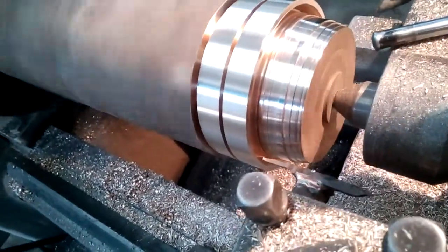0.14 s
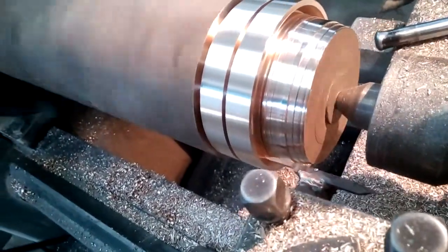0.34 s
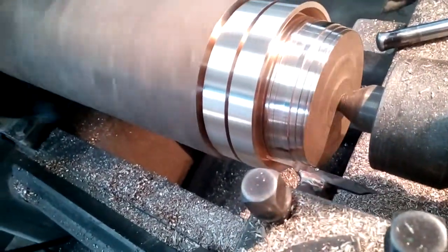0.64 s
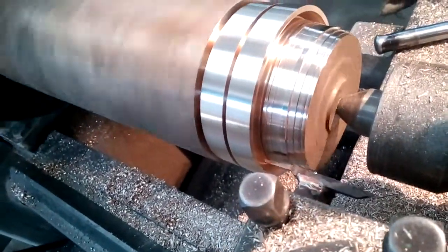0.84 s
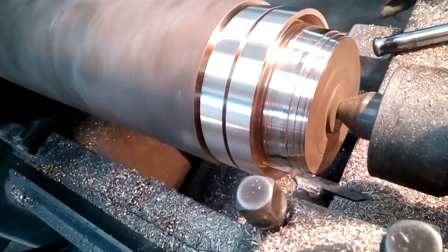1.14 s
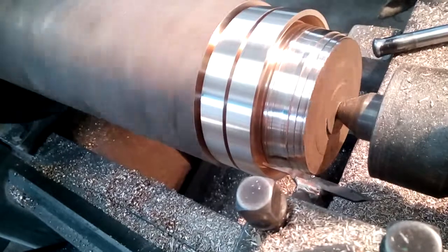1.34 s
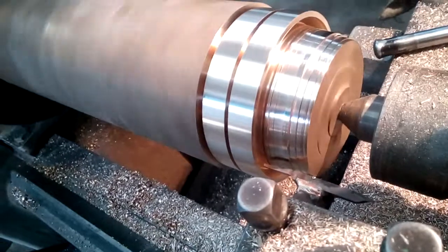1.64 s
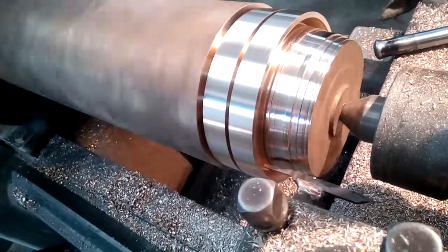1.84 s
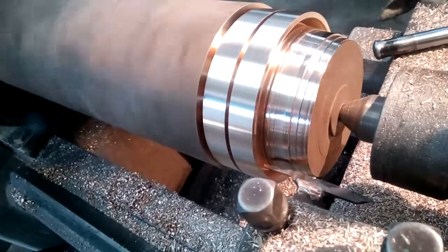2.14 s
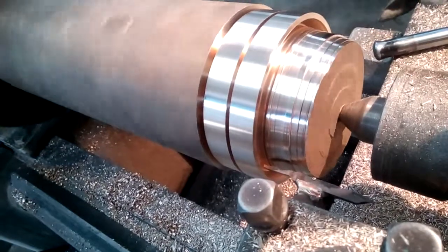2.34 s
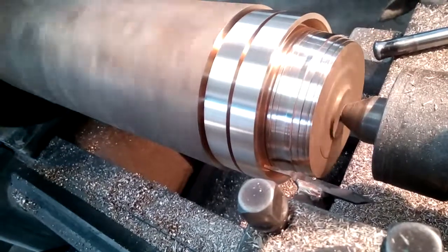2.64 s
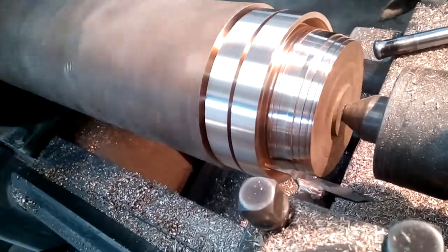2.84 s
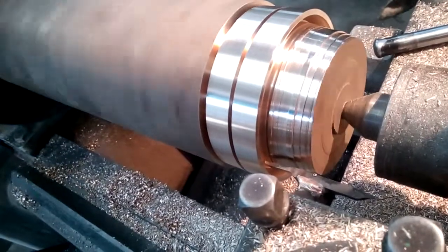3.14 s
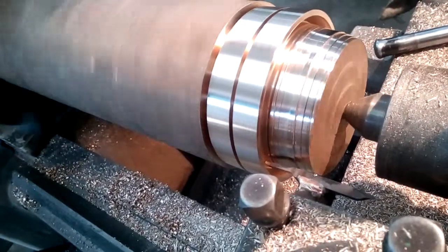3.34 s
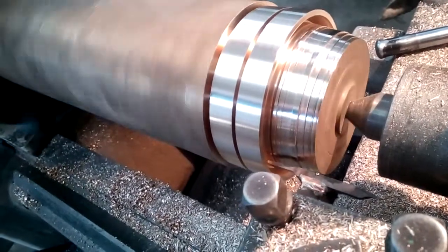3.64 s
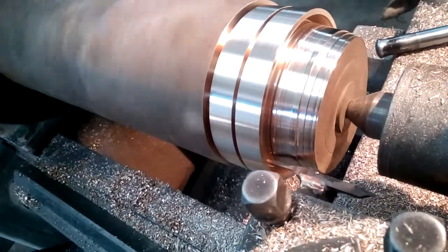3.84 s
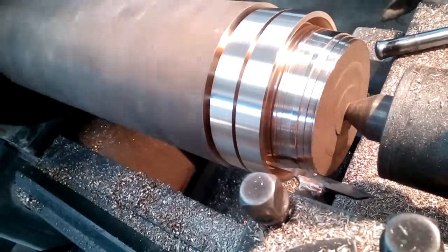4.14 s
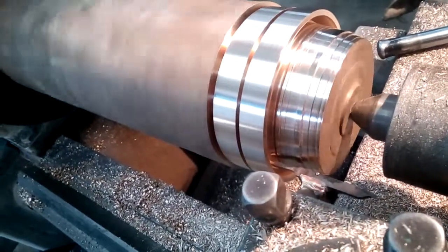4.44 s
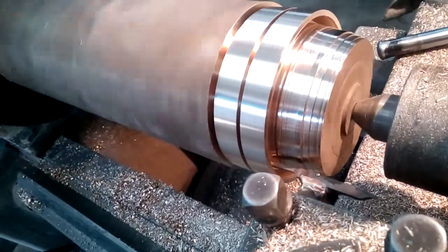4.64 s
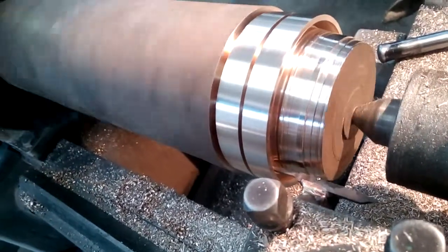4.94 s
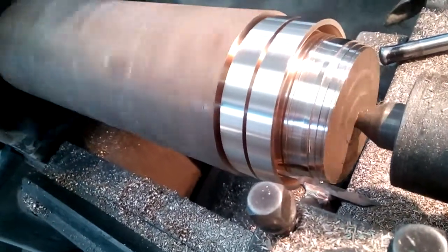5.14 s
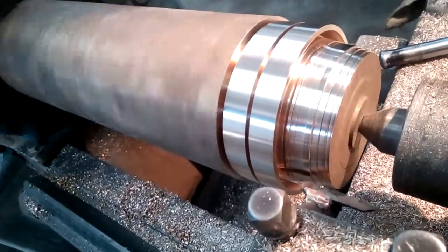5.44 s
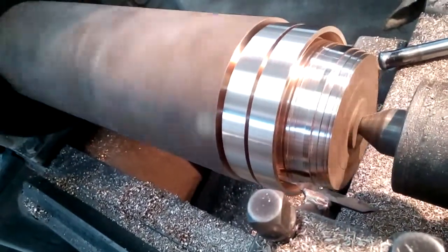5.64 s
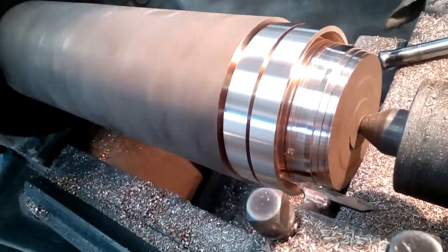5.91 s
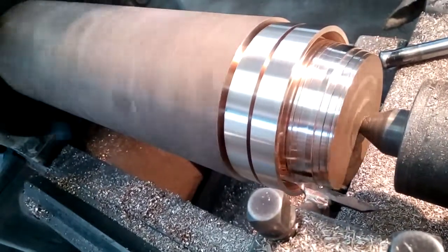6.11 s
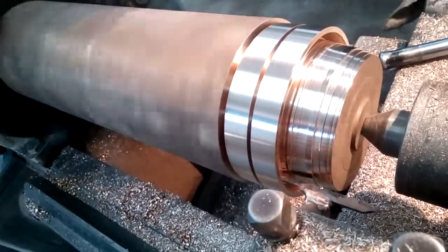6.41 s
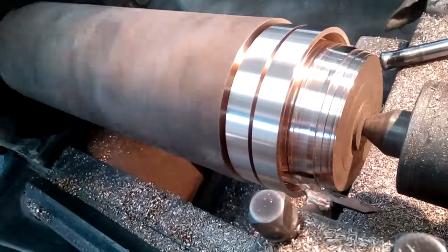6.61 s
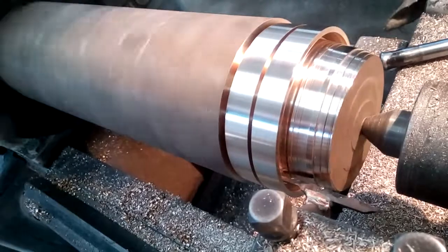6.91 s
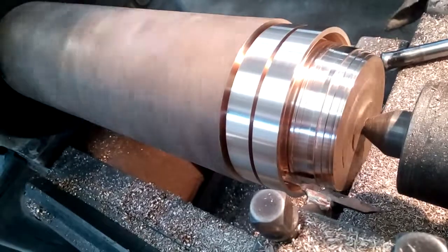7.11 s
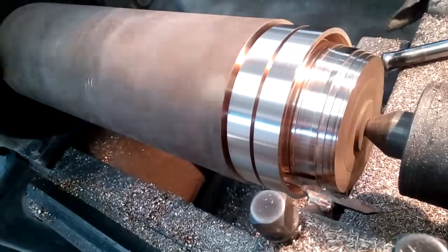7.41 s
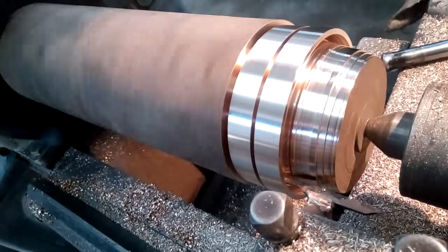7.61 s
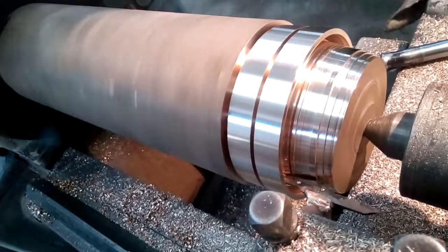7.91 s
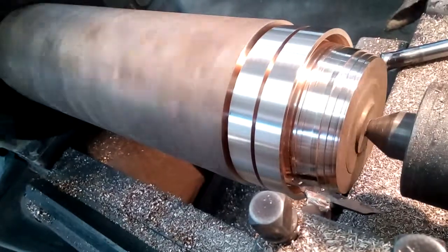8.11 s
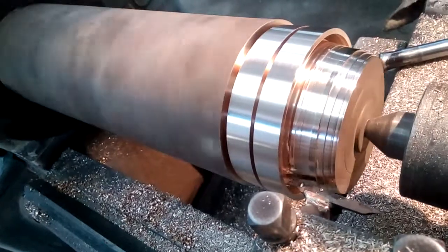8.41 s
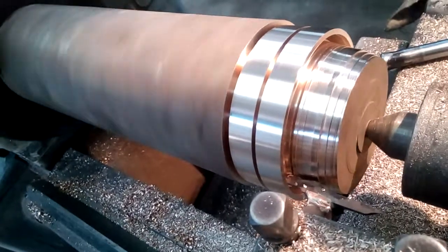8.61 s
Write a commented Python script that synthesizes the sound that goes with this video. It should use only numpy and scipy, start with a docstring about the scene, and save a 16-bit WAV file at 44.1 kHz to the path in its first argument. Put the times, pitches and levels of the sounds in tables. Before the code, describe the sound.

From 0 to about 5.5 s a metal lathe runs alone, close by: steady low gear rumble, grainy midrange hiss from the teeth, wavering gear tones and a low headstock drone that beats slightly. At 5.55 s a tool touches the spinning brass ring with a thin, high scrape. By 5.9 s it swells into a very loud, rough squeal, tearing and chattering, with piercing shrieks, a lower unsteady howl from the ring and brief chip whistles, mostly sliding down. It peaks from 6.1 to 6.8 s, overloading the microphone and covering the lathe, then weakens into scraping until 7.2 s. The lathe is alone until 7.5 s. A second cut begins as faint rasping, grows around 8 s and shrieks strongest near 8.4 s, still rough and whistling until about 8.8 s, at the end. Short workshop reflections surround the cuts.

```python
"""A tool fed twice into a spinning brass ring rasps, then chatters in a loud, rough, high squeal.
Friction drives unsteady tool modes; the ring howls below and growing chips whistle, mostly downwards.
Behind it a lathe runs on: shaped noise for gear rumble and hiss, wavering tones for gears, drive
and headstock. The workshop adds short reflections, and the squeal overloads the microphone."""
import sys
import numpy as np
from scipy import signal
from scipy.fft import rfft, irfft, next_fast_len
from scipy.io import wavfile
from scipy.ndimage import uniform_filter1d

SR = 44100
rng = np.random.default_rng(int(sys.argv[2]) if len(sys.argv) > 2 else 0)


def generate_wav(sig):
    """Save sig (samples, or channels by samples) to the path in sys.argv[1] as 16-bit PCM at SR."""
    pcm = np.round(np.clip(np.atleast_2d(sig).T, -1, 1) * 32767).astype(np.int16)
    wavfile.write(sys.argv[1], SR, pcm)


N = 386316

# low rumble of the running gear train: f/Hz, relative level/dB per Hz
GEAR_RUMBLE_SPECTRUM = [(25, -23), (42, -26), (64, -26), (80, -16.5), (110, -13), (165, -13.5),
                        (195, -10.5), (240, -10), (320, -6.5), (400, -11), (470, -6), (610, -7.5),
                        (710, -12), (1000, -13.5), (1300, -29.5)]
# hiss of the gear teeth: f/Hz, relative level/dB per Hz
GEAR_HISS_SPECTRUM = [(700, -30), (1000, -3.5), (1750, 0.5), (2250, -10), (3400, -9.5), (4500, -14),
                      (4950, -22), (5600, -23), (6000, -19.5), (6550, -20.5), (7000, -32.5), (7700, -37.5),
                      (8400, -53), (10000, -61)]
# tones of motor and gears: f/Hz, relative level/dB, relative spread/Hz
GEAR_TONES = [(98.6, -52.5, 2.4), (130, -55, 4.4), (305, -53, 6.6), (454, -43, 19.97), (483, -46.5, 3.05),
              (560.6, -41, 14), (592, -46, 5.2), (615.6, -43.5, 6), (794.6, -46, 12.22), (858, -44.5, 10.4),
              (961, -41.5, 0.88), (1179, -45, 12.08), (1279, -43, 45), (1475, -43, 10.73),
              (1570, -40.5, 13.4), (1620, -63, 4), (1780, -61, 3.5), (2046, -53, 4.1), (2186, -50, 3),
              (3214, -51, 10.4)]
# hum of the drive: f/Hz, width/Hz, idling level/dB, loaded level/dB
DRIVE_HUM = [(51, 3, -52.5, -58), (84, 1.4, -68, -48.5)]
# beating tones of the headstock: f/Hz, relative level/dB, width/Hz
HEADSTOCK_TONES = [(189.6, -8.5, 16), (196.3, 0.5, 2.85), (211, -4, 7.1), (220.6, -3, 22)]
# tool in the cut: start t/s, end t/s
CUTS = [(5.555, 7.19), (7.525, 8.8)]
# one curve a cut: t/s, friction at the edge level/dB, force of the chip on ring and holder level/dB
CUT_CURVES = [
    [(5.55, -58.5, -46), (5.6, -40, -51), (5.824, -30, -35), (5.916, -19, -20), (6.106, -20, -12.5),
     (6.518, -16, -18), (6.528, -15, -13.5), (6.79, -19, -17), (6.996, -29.5, -37), (7.14, -34, -25.5),
     (7.2, -52, -45)],
    [(7.52, -58, -51), (7.624, -35.5, -37.5), (7.688, -41.5, -33), (7.91, -33, -29.5),
     (8.022, -22.5, -19.5), (8.304, -23.5, -24), (8.388, -15.5, -16.5), (8.396, -19, -18),
     (8.522, -20, -19), (8.626, -26, -20.5), (8.74, -22, -21)],
]
# whistles of growing chips: start t/s, end t/s, start f/Hz, end f/Hz, level/dB
CHIP_WHISTLES = [(6.06, 6.16, 5310, 5050, -13.5), (6.093, 6.227, 5540, 5400, -19),
                 (6.162, 6.225, 4260, 4160, -9), (6.17, 6.256, 2825, 2960, -19.5),
                 (6.185, 6.324, 3840, 3660, -23), (6.33, 6.477, 5430, 5140, -22),
                 (6.504, 6.62, 3760, 3520, -23), (6.875, 7.03, 5370, 4850, -33),
                 (7.064, 7.164, 3060, 3210, -30), (7.778, 7.97, 5300, 4780, -32),
                 (7.975, 8.125, 4000, 3590, -26), (8.0, 8.13, 5000, 4800, -41),
                 (8.13, 8.243, 5420, 5180, -26), (8.682, 8.802, 5160, 5000, -26)]
# modes in which the ring howls: f/Hz, width/Hz, level/dB once it sings freely
RING_MODES = [(1682, 80, -27), (1966, 75, -28.5), (2675, 25, -35)]
# swells of the ring's howl: start t/s, end t/s, start f/Hz, end f/Hz, level/dB
HOWL_SWELLS = [(5.86, 6.1, 1970, 1980, -26.5), (5.88, 6.29, 1700, 1604, -20), (5.86, 6.1, 2790, 2744, -28),
               (5.97, 6.075, 1625, 1687, -15.5), (6.72, 6.92, 2680, 2660, -32),
               (8.14, 8.44, 2670, 2700, -33), (8.32, 8.55, 2075, 2017, -24.5),
               (6.125, 6.215, 2760, 2640, -18), (6.195, 6.28, 1506, 1484, -17.5),
               (6.405, 6.535, 1653, 1736, -10.5), (6.52, 6.63, 1783, 1800, -13.5),
               (6.61, 6.78, 1708, 1657, -12), (6.77, 6.875, 1830, 1894, -22),
               (6.895, 7.0, 1690, 1706, -25.5), (7.078, 7.172, 1582, 1587, -20),
               (8.0, 8.135, 1990, 1960, -23), (8.26, 8.335, 1870, 1790, -23), (8.43, 8.53, 1990, 2040, -18),
               (8.455, 8.57, 1600, 1700, -29), (8.59, 8.715, 1760, 1613, -24.5)]
# resonances of tool, holder and ring under the rasp: f/Hz, width/Hz, relative level/dB
BODY_MODES = [(2340, 100, -10.5), (2950, 270, -12), (3276, 430, -9), (3490, 160, -11), (3980, 66, -2.5),
              (4120, 78, -2), (4620, 45, -3.5), (4610, 100, -11.5), (5600, 130, -7), (5500, 120, -1),
              (5790, 170, 0.5), (6240, 120, 7), (6510, 71, 8), (6750, 170, 3), (7040, 130, -2.5),
              (7460, 64, 0), (7630, 54, -14), (8315, 60, -3.5), (9120, 110, -17), (10140, 120, -19.5),
              (10430, 120, -19.5), (10900, 60, -19.5), (11740, 180, -19.5)]
# broad hiss of tearing metal: f/Hz, relative level/dB per Hz
TEARING_SPECTRUM = [(900, -32), (1500, -4), (3000, -13), (4200, -4.5), (6500, -9.5), (8200, -2.5),
                    (8700, -18.5), (9700, -29), (11500, -25), (12700, -28), (15500, -42)]
# modes in which tool and holder chatter all through a cut: f/Hz, width/Hz, level/dB over the friction
TOOL_MODES = [(4514, 62, -10), (4220, 110, -11), (6050, 54, -0.5), (6380, 47, -3), (7670, 220, -6)]
# shrieks, when the tool locks into one mode: start t/s, end t/s, start f/Hz, end f/Hz, level/dB
SHRIEKS = [(5.575, 5.92, 6430, 6450, -35), (5.67, 5.9, 4500, 4550, -44), (5.725, 5.8, 6440, 6370, -22.5),
           (5.905, 6.18, 6410, 6250, -10), (5.89, 6.18, 4500, 4400, -19.5), (5.96, 6.17, 5980, 6140, -15),
           (6.19, 6.255, 6380, 6420, -6.5), (6.51, 6.595, 6480, 6440, -8.5),
           (6.525, 6.6, 4530, 4500, -21.5), (6.6, 6.77, 6420, 6390, -12.5), (6.755, 6.855, 4240, 4300, -19),
           (7.0, 7.07, 5980, 6100, -21), (7.665, 7.94, 6250, 6200, -30), (7.66, 7.88, 4580, 4540, -36),
           (7.96, 8.2, 6060, 6120, -23.5), (8.325, 8.48, 6470, 6370, -14), (8.345, 8.41, 4500, 4500, -16.5),
           (8.57, 8.69, 6140, 6100, -18)]

LOADED_AT_S, LOADING_S = 6.35, 0.53   # the first heavy cut shifts the hum: when, and over how long
DRONE_DB, DRONE_SAG_DB, SAG_POWER = -35, 11, 5.7   # idle level; it sags, but only near full load
SHOP_T60_S = 0.28
LOAD_FOLLOWS = 0.402   # share of the friction's swing in dB that the load follows
SPINDLE_HZ, RUNOUT_DB, HIGH_SPOT_S = 11.5, 0.48, 5.95   # ring out of true: it bites harder once a turn
SMALL_CHIPS_PER_S, SMALL_CHIP_DB = 9.2, -7.5   # lesser chips come at random; level over the force
SMALL_CHIP_S, CHIP_SAG_HZ_PER_S = 0.13, 2700   # mean length, and how fast their whistle falls
HOWL_FROM_DB, HOWL_FULL_DB = -33.5, -17   # force at which the ring starts to sing, and sings freely
WANDER_WIDTHS = 0.55   # rms wander of a ring mode, in its own widths
EDGE_ABOVE_HZ = 5900   # friction drives the rasp above this pitch, the force of the chip below
BODY_GROWTH = 1.08   # dB by which the lower rasp grows for each dB of force
CUTOFF_HZ = 15450


def from_db(db):
    """Decibels to gain."""
    return 10 ** (np.asarray(db) / 20)


def rms_one(x):
    """Scale to unit power."""
    return x / np.sqrt(np.mean(np.abs(x) ** 2) + 1e-20)


def seconds():
    """Time of every sample."""
    return np.arange(N) / SR


def in_time(rows):
    """Each column of a curve, drawn out sample by sample."""
    s, *columns = np.transpose(rows)
    return [np.interp(seconds(), s, column) for column in columns]


def gate(start, end, fade):
    """One between two moments, with sloping edges."""
    return np.clip(np.minimum(seconds() - start, end - seconds()) / fade, 0, 1)


def drift(rate, size=N):
    """Smooth random motion of unit rms: noise through two equal low-pass poles at the rate in Hz."""
    step = 16   # drawn at every 16th sample, with straight lines between
    pole = np.exp(-2 * np.pi * rate * step / SR)
    settle = 3000
    noise = rng.standard_normal(size // step + settle + 2)
    slow = rms_one(signal.lfilter([1], [1, -2 * pole, pole * pole], noise)[settle:])
    between = np.arange(step) / step
    return (slow[:-1, None] + np.diff(slow)[:, None] * between).ravel()[:size]


def coloured(x, spectrum):
    """Give a sound a smooth spectrum that falls 24 dB per octave beyond its ends."""
    size = next_fast_len(N)
    hz, db = np.transpose(spectrum)
    octave = np.log2(np.maximum(np.fft.rfftfreq(size, 1 / SR), 1))
    corners = np.log2(hz)
    outside = np.abs(octave - np.clip(octave, corners[0], corners[-1]))
    gain = from_db(np.interp(octave, corners, db) - 24 * outside)
    return irfft(rfft(x, size) * gain, size)[:N]


def cycle(hz, size=N):
    """Running phase of a steady or gliding pitch."""
    turns = np.cumsum(np.broadcast_to(hz / SR, size))
    return (2 * np.pi * (turns - np.floor(turns))).astype(np.float32)


def chatter(hz, width, evenness, size=N):
    """A self-excited mode: slips keep upsetting its phase and swing, while friction caps the swing."""
    a, b = drift(width * 0.95, size), drift(width * 0.65, size)
    phase = cycle(hz, size)
    swing_squared = (a * a + b * b + 0.054).astype(np.float32)
    cap = swing_squared ** np.float32(evenness / 2)   # evenness 0 leaves the swing free, 1 nearly flat
    return rms_one((a * np.cos(phase) - b * np.sin(phase)) / cap)


def glides(rows, offset_hz, fade_s, width, evenness):
    """Short bouts of chatter: each swells, holds while its pitch slides, and dies."""
    out, t = np.zeros(N + SR), np.arange(SR // 2) / SR
    offset_hz = np.pad(offset_hz, (0, SR))
    for start, end, start_hz, end_hz, db in rows:
        first = int(start * SR)
        span = slice(first, first + len(t))
        pitch = np.interp(t, [0, end - start], [start_hz, end_hz]) + offset_hz[span]
        swell = np.clip(np.minimum(t, end - start - t) / fade_s, 0, 1)
        out[span] += from_db(db) * swell * chatter(pitch, width, evenness, size=len(t))
    return out[:N]


def stutter(load):
    """Pitch offset of a mode in Hz: small under a light touch, torn about by slips under heavy feed."""
    return 22 * drift(9) + 32 * load * drift(140)


def lathe():
    """Meshing gears rumble and hiss; their tones waver, and the drive's hum shifts once loaded."""
    rumble = from_db(-30) * rms_one(coloured(rng.standard_normal(N), GEAR_RUMBLE_SPECTRUM))
    teeth = rng.standard_normal(N) * from_db(1.15 * drift(90))
    hiss = from_db(-31) * rms_one(coloured(teeth, GEAR_HISS_SPECTRUM))
    tones = 0
    for hz, db, spread in GEAR_TONES:
        core = np.sqrt(2) * np.sin(cycle(hz + 0.3 * spread * drift(2)))
        skirt = 0.71 * chatter(hz, 2.2 * spread, evenness=0.27)   # uneven teeth smear each tone
        tones = tones + from_db(db - 2.5) * (core + skirt)
    loaded = np.clip((seconds() - LOADED_AT_S) / LOADING_S, 0, 1)
    hum = 0
    for hz, width, idle_db, loaded_db in DRIVE_HUM:
        hum_db = idle_db + loaded * (loaded_db - idle_db)
        hum = hum + from_db(hum_db) * chatter(hz, width, evenness=0.8)
    return rumble + hiss + tones + hum


def drone(load):
    """Close tones of the headstock beat against one another, and sag under the heaviest cut."""
    tones = sum(from_db(db) * chatter(hz, width, evenness=0.34) for hz, db, width in HEADSTOCK_TONES)
    return from_db(DRONE_DB - DRONE_SAG_DB * load ** SAG_POWER) * rms_one(tones)


def workshop(x, wet_db):
    """Dense reflections from the machine bed and the walls: a decaying noise tail after 3 ms."""
    t = np.arange(SR // 2) / SR
    tail = rng.standard_normal(len(t)) * from_db(-60 * t / SHOP_T60_S) * (t > 0.003)
    reflections = signal.fftconvolve(x, tail / np.linalg.norm(tail))[:N]
    return x + from_db(wet_db) * reflections


def chips(force_db, load):
    """Each chip whistles and flutters, mostly gliding down as it grows, then fades."""
    flutter = 60 * load * drift(91)   # Hz
    small = []
    first, last = CUTS[0][0], N / SR - SMALL_CHIP_S
    count = int(SMALL_CHIPS_PER_S * (last - first))
    for when, pitch, length in rng.random((count, 3)):
        start = first + when * (last - first)
        hz = 4250 + 1500 * pitch
        lasts = SMALL_CHIP_S * (0.5 + length)
        small.append((start, start + lasts, hz, hz - CHIP_SAG_HZ_PER_S * lasts, SMALL_CHIP_DB))
    large_whistles = glides(CHIP_WHISTLES, flutter, fade_s=0.033, width=61, evenness=0.17)
    small_whistles = glides(small, flutter, fade_s=0.063, width=46, evenness=0.33)
    return large_whistles + from_db(force_db) * small_whistles


def howl(force_db, load):
    """Past a threshold of force the ring itself sings, sliding about in pitch and swelling in bouts."""
    singing = np.clip((force_db - HOWL_FROM_DB) / (HOWL_FULL_DB - HOWL_FROM_DB), 0, 1)
    modes = 0
    for hz, width, db in RING_MODES:
        flare = from_db(db + 2.5 * drift(7.8))
        pitch = hz + WANDER_WIDTHS * width * drift(12)
        modes = modes + flare * chatter(pitch, width, evenness=0.24)
    swells = glides(HOWL_SWELLS, 16 * load * drift(25), fade_s=0.029, width=52, evenness=0.43)
    return singing * modes + swells


def rasp(friction_db, force_db, load):
    """Tearing brass hisses and drives many modes; each wanders with the contact and flares on its own."""
    peak_db = force_db.max()
    edge = from_db(friction_db)
    body = from_db(peak_db + BODY_GROWTH * (force_db - peak_db) - 1.35)
    crackle = rng.standard_normal(N) * from_db(6.2 * drift(438))
    bursts = rms_one(coloured(crackle, TEARING_SPECTRUM))
    low = signal.sosfilt(signal.butter(4, EDGE_ABOVE_HZ, fs=SR, output="sos"), bursts)
    high = signal.sosfilt(signal.butter(3, EDGE_ABOVE_HZ, "high", fs=SR, output="sos"), bursts)
    modes = 0
    for hz, width, db in BODY_MODES:
        drive = edge if hz > EDGE_ABOVE_HZ else body
        flare = from_db(db + 3.5 * drift(26))
        modes = modes + drive * flare * chatter(hz + stutter(load), width, evenness=0.75)
    return from_db(-10) * modes + from_db(-5.5) * body * low + from_db(-3.5) * edge * high


def squeal(friction_db, load):
    """The tool's modes grow with the friction and flare by chance; now and then one locks in and shrieks."""
    modes = 0
    for hz, width, db in TOOL_MODES:
        level = from_db(friction_db + db + drift(9.2))
        modes = modes + level * chatter(hz + stutter(load), width, evenness=0.089)
    return modes + glides(SHRIEKS, stutter(load), fade_s=0.025, width=55, evenness=0.14)


def scene():
    """The cut sounds over the running machine while the tool touches the ring, gripping unevenly."""
    friction_db, force_db = in_time(np.concatenate(CUT_CURVES))
    load = from_db(LOAD_FOLLOWS * (friction_db - friction_db.max()))   # 1 at the heaviest friction
    runout_db = RUNOUT_DB * np.cos(2 * np.pi * SPINDLE_HZ * (seconds() - HIGH_SPOT_S))
    grip_db = runout_db + 1.1 * drift(50)
    touching = sum(gate(start, end, fade=0.0094) for start, end in CUTS)
    contact = touching * from_db(grip_db)
    cut = chips(force_db, load) + howl(force_db, load)
    cut = cut + rasp(friction_db, force_db, load) + squeal(friction_db, load)
    return (lathe() + drone(load) + workshop(contact * cut, wet_db=-11))[None]


def record(dry, limit_db=-8, slope=0.74, ceiling=0.97):
    """Gain control turns loud passages down, the highest peaks clip, the top is cut."""
    power = uniform_filter1d(dry ** 2, SR // 25, axis=-1)   # over 40 ms
    level_db = 10 * np.log10(np.maximum(power, 1e-12))
    held = dry * from_db(-slope * np.maximum(level_db - limit_db, 0))
    clipped = held / (1 + (held / ceiling) ** 8) ** (1 / 8)
    return signal.sosfilt(signal.ellip(10, 0.1, 70, CUTOFF_HZ, fs=SR, output="sos"), clipped)


dry = scene()
out = record(dry)
generate_wav(out)
```